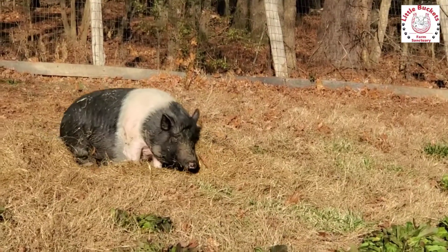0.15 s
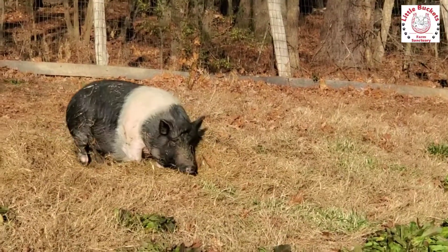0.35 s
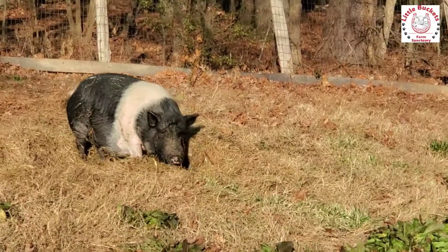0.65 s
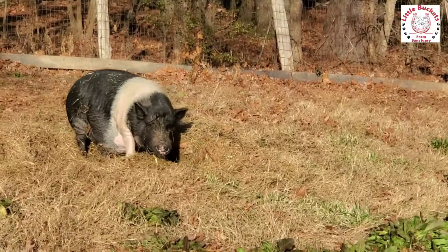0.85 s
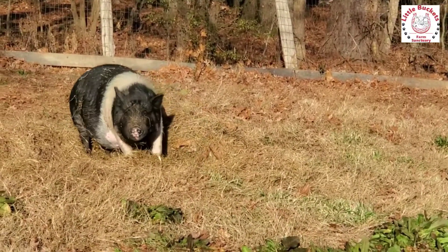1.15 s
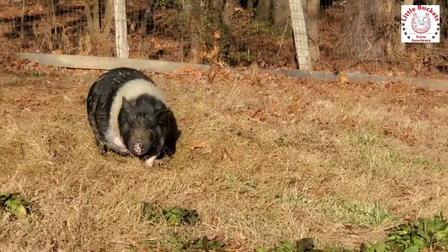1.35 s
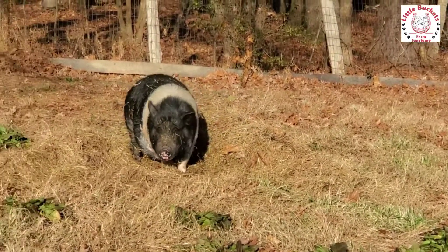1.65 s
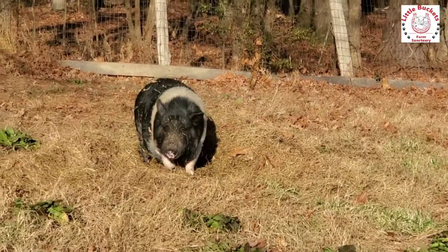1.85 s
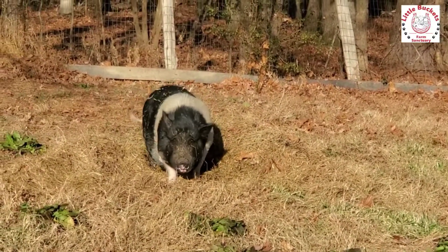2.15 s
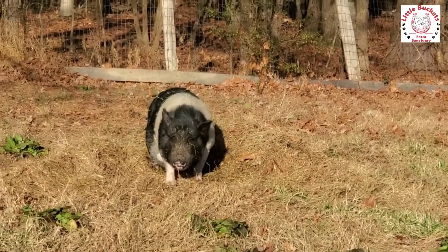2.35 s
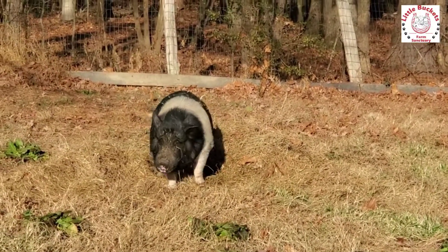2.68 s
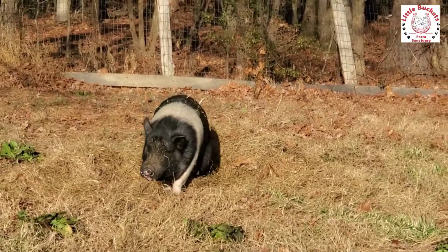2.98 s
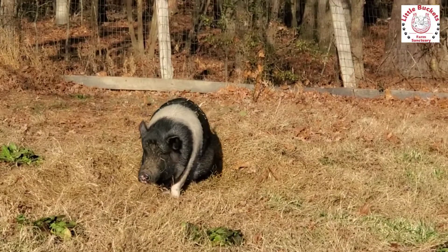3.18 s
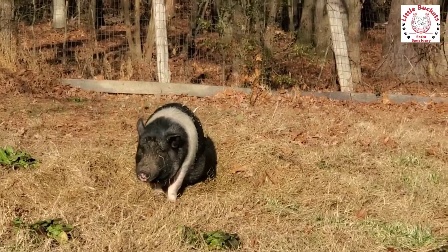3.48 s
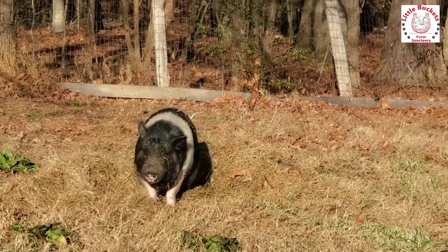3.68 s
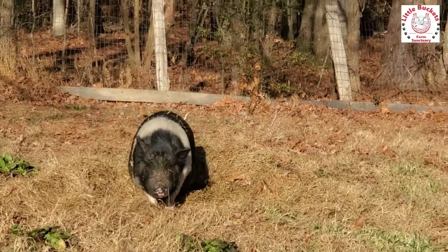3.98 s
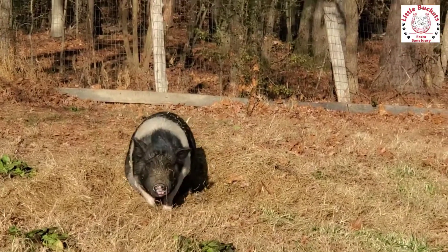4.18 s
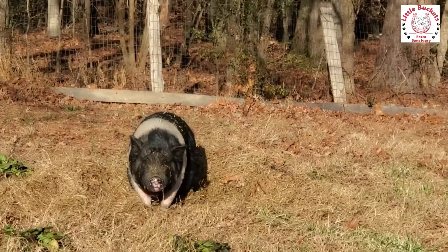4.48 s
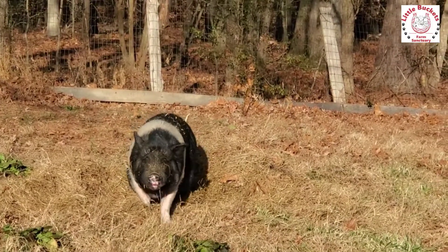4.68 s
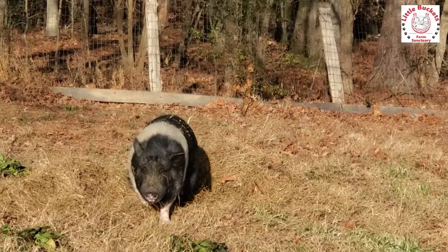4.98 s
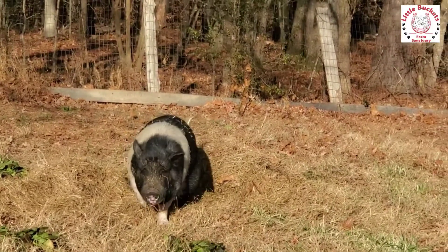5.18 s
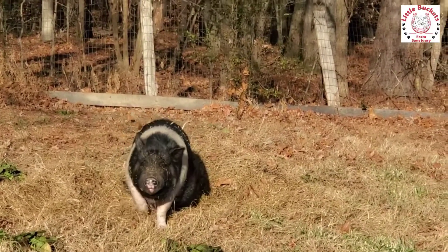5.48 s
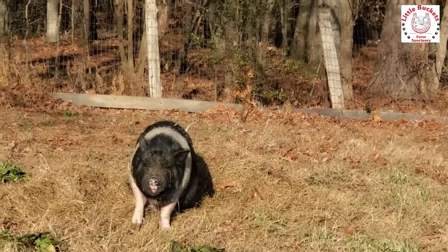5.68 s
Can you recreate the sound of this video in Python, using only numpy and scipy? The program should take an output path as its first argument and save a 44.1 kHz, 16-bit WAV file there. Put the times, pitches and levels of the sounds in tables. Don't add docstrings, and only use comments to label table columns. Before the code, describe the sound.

Outdoors in a dry grassy paddock beside woods, a pig begins mid-grunt, pauses, then repeats short guttural grunts roughly every half second to second. Breath rasps out after most of them and hisses through the nose, with weak rattling snores between. Wind thumps softly on the two microphone ports, swelling around three seconds. Thin insect chirps, a dry stalk tick and dull wooden taps sit behind, with almost no echo.

```python
import sys
import numpy as np
from scipy import signal
from scipy.fft import rfft, irfft, next_fast_len
from scipy.io import wavfile
from scipy.ndimage import uniform_filter1d, map_coordinates

SR = 44100
rng = np.random.default_rng(int(sys.argv[2]) if len(sys.argv) > 2 else 0)


def master_out(mix):
    frames = np.transpose(np.atleast_2d(mix))
    ceiling = np.clip(frames, -1, 1)
    pcm = np.round(ceiling * 32767).astype(np.int16)
    wavfile.write(sys.argv[1], SR, pcm)


def voltage_ratio(decibels):
    exponent = np.asarray(decibels, float) / 20
    return 10 ** exponent


N = 257544
T = np.arange(N) / SR

# f/Hz, width/Hz, level/dB
NOSE = [(3310, 370, 0.5), (4400, 460, 0), (5300, 150, -6), (5650, 200, -8)]
# f/Hz, width/Hz, level/dB
SLACK = [(246, 27, -2.5), (640, 140, 7), (1194, 46, -3), (2300, 52, -12), (2860, 98, -22), (3580, 67, -9.5)]
GAPING = [(395, 57, 0.5), (594, 48, -8.5), (782, 19, -2), (1386, 74, -5), (1830, 70, -7.5),
          (2600, 60, -20.5), (3020, 80, -21.5), (3800, 190, -15)]
WIDE = [(864, 69, -4), (1422, 51, 1.5), (1655, 40, -10), (2260, 86, -22), (2800, 55, -16), (3850, 77, -27)]
BRACED = [(251, 87, -21.5), (511, 33, 1), (625, 67, -9.5), (924, 65, -3.5), (1735, 150, -9),
          (2205, 100, -4.5), (2690, 130, -12), (3500, 140, -17.5)]
SIDELONG = [(525, 220, 1), (806, 65, -4), (1063, 190, -6), (1480, 83, -3.5), (2160, 240, -2),
            (2720, 130, -7), (3170, 130, -3), (3850, 110, -15)]
NASAL = [(564, 83, -1.5), (1280, 26, -15), (1900, 90, -12), (2690, 90, -7), (3250, 77, -3.5),
         (3800, 130, -8)]
PINCHED = [(492, 150, -4.5), (1140, 390, -13.5), (2280, 210, -11.5), (2820, 77, -9), (3300, 190, -9.5),
           (5650, 80, -5)]
EASED = [(588, 185, -1.5), (925, 92, -9), (1108, 190, -4.5), (2050, 84, -8.5), (2270, 180, -20),
         (3150, 160, -10), (3850, 800, -10)]
SHUT = [(597, 180, -1), (1350, 110, -8.5), (1950, 70, -11), (2560, 60, -15), (3200, 60, -18.5)]
DRAWN = [(643, 66, 16), (1336, 56, -3), (2000, 55, -7), (2820, 70, -10), (3210, 81, -11)]
CLENCHED = [(445, 300, 9.5), (1310, 44, 1), (1910, 150, 7), (2750, 60, 15), (3300, 80, 8), (5600, 130, 9)]
SMALL = [(554, 97, -1), (1038, 150, -12.5), (2300, 33, -6.5), (3920, 120, -21.5)]
INWARD = [(324, 110, 8), (650, 130, 1.5), (1240, 51, 5), (1930, 60, -14), (2930, 100, -24),
          (3300, 100, -25)]


def unit(x):
    return x / np.sqrt(np.mean(x ** 2) + 1e-20)


def along(points, hz):
    f, v = np.transpose(points)
    return np.interp(np.log(hz + 1), np.log(f + 1), v)


def curves(rows, t=T):
    s, *cols = np.transpose(rows)
    return [np.interp(t, s, c) for c in cols]


def wobble(rate):
    return map_coordinates(rng.standard_normal(int(N * rate / SR) + 4), [T * rate])


def filtered(x, response):
    n = x.shape[-1]
    m = next_fast_len(n + 8192)
    return irfft(rfft(x, m) * response(np.fft.rfftfreq(m, 1 / SR)), m)[..., :n]


def modes(rows, least_hz):
    wide = [(c, max(w, least_hz + .03 * c), db) for c, w, db in rows]

    def response(f):
        total = 0
        for k, (c, w, db) in enumerate(wide):
            total = total + (-1) ** k * voltage_ratio(db) * 1j * f * w / (c * c - f * f + 1j * f * w)
        return total
    return response


def rush(spectrum, patchy_db):
    z = signal.stft(rng.standard_normal((2, N)), nperseg=512)[2]
    field = uniform_filter1d(uniform_filter1d(rng.standard_normal(z.shape[1:]), 6, 0), 10, 1)
    pair = signal.istft(z * voltage_ratio(patchy_db * unit(field)), nperseg=512)[1][:, :N]
    return unit(filtered(pair, lambda hz: voltage_ratio(along(spectrum, hz))))


def grunts():
    flow = rng.standard_normal(N) * voltage_ratio(1.3 * wobble(70) + 2.5 * wobble(220))
    voice = throat_flaps() + leaks(flow) + rasps(flow)
    return filtered(voice[:N], lambda f: 1 / (1 + (f / 6200) ** 8))


def throat_flaps():
    # t/s, peak level/dB, snap level/dB, rise/ms, snap
    # f/Hz
    flap_events = [(0.0139, -15.5, -16, 1.1, 3360), (.034, -15.5, -21.5, 2.3, 1600),
                   (1.316, -22.5, -25.5, 4.9, 2770), (1.3323, -10.5, -19.5, 3.4, 2650),
                   (1.351, -9.5, -8, 4.1, 3760), (1.372, -23, -19, 1.4, 1820), (1.385, -34, 5.5, 3.7, 1480),
                   (1.886, -11.5, -22, 10.7, 2140), (1.908, -14.5, -4, 2.4, 1830),
                   (1.922, -17.5, -11.5, 4.6, 3850), (2.196, -42.5, 1, 6, 2300),
                   (2.209, -27, -24.5, 2.1, 1830), (2.2387, -9, -17.5, 7.6, 2205),
                   (2.257, -10, -8, 4.5, 1700), (4.118, -34.5, -13.5, 3.5, 1210),
                   (4.141, -45, -6.5, 2.3, 1930), (4.165, -38.5, -5, 4.5, 1930),
                   (4.206, -34, 1.5, 2.5, 1400), (5.787, -33.5, -37, 7.2, 2560),
                   (0.541, -44.5, -36, 2.5, 1900), (0.568, -46.5, -17, 4.1, 3650),
                  (.611, -43, -12, 3.3, 3580), (0.642, -37.5, -11, 1.8, 3800), (0.664, -37, -10.5, 2, 3150),
                  (.677, -34, -22, 5.8, 3300), (0.722, -29.5, -9, 3.3, 2200),
                  (1.306, -34.5, -36, 2.5, 1530), (1.403, -24, -4, 5.4, 1400),
                  (2.602, -40.5, -10, 2.4, 3800), (2.63, -52, 3.5, 0.65, 5600),
                  (2.907, -39.5, -1.5, 2.4, 2066), (2.93, -38.5, -7, 2.3, 2000),
                  (2.952, -39.5, -2.5, 2.3, 1830), (2.987, -26, -28, 1.6, 1400),
                  (3.472, -37, -22, 3.2, 3180), (3.494, -28.5, -9, 2.9, 3200),
                  (3.519, -37, -2.5, 2.3, 2820), (3.545, -35.5, 1.5, 2.5, 2840),
                  (4.913, -39, -7.5, 4.1, 2400), (4.939, -36, -3.5, 3.1, 5650), (5.018, -39, -25, 3, 1400),
                  (5.031, -24.5, -27, 2, 1450), (5.051, -15.5, -14.5, 3, 2720),
                  (5.075, -27.5, -18, 0.88, 2200), (5.804, -22, -17.5, 2.26, 1400),
                  (5.825, -23.5, -17, 1.5, 2560)]
    # f/Hz, width/Hz, level/dB
    hummed = [(610, 144, 13), (1150, 140, -26), (1600, 95, -16), (2400, 100, -20), (3650, 100, -2),
              (4630, 140, -6)]
    opening = [(248.4, 100, -20.5), (493, 91, -2), (757, 53, -12), (990, 91, -16.5), (2140, 130, -8),
               (2840, 80, -19.5)]
    pursed = [(459.3, 21, 0.5), (873, 38, -6), (1830, 75, -14), (2090, 200, -2.5), (2790, 70, -13),
              (3850, 100, -19.5)]
    loosened = [(hz, 1.4 * width, db) for hz, width, db in BRACED]

    first_shapes = [SLACK, hummed] + [GAPING] * 4 + [WIDE, opening] + [pursed] * 2 + [SMALL] * 2
    first_shapes += [BRACED, loosened] + [INWARD] * 4 + [SHUT]
    further_shapes = [EASED] * 2 + [NASAL] * 4 + [EASED, GAPING, WIDE] + [PINCHED] * 2 + [DRAWN] * 3
    further_shapes += [EASED] + [CLENCHED] * 4 + [PINCHED] * 2 + [SIDELONG] * 4 + [SHUT] * 2

    out = np.zeros(N + SR)
    for row, shape in zip(flap_events, first_shapes + further_shapes):
        s, db, snap_db, rise_ms, snap_hz = row
        moved = [(hz * (1 + .02 * rng.normal() * (hz > 1100)), width, level) for hz, width, level in shape]
        ring = flap(moved, snap_hz, snap_db + rng.normal(), rise_ms)
        out[round(s * SR):][:SR // 16] += voltage_ratio(db + 4.0) * ring
    return out


def flap(shape, snap_hz, snap_db, rise_ms):
    t = np.arange(SR // 16) / SR
    hz, width, db = np.transpose(shape)[:, :, None]
    late = np.clip(t - rise_ms / 1000, 0, None)
    swell = np.clip(1000 * t / rise_ms, 0, 1) ** 1.2
    tones = np.sin(2 * np.pi * hz * t)

    low_decay = np.exp(-np.pi * np.clip(width, 35, 200) * late)
    low = -swell * np.sum((hz < 1300) * voltage_ratio(db) * low_decay * tones, axis=0)

    damp_hz = 30 + .02 * hz
    upper = (hz >= 1300) * voltage_ratio(db + rng.normal(0, 0.9, hz.shape))
    high = np.sum(upper * np.exp(-np.pi * np.clip(width, damp_hz, 300) * late) * tones, axis=0)
    snap = np.exp(-np.pi * (20 + 0.033 * snap_hz) * late) * np.sin(2 * np.pi * snap_hz * t)
    high = 0.67 * high / (upper.max() + 1e-9) + 0.77 * snap

    puff = .22 * np.exp(-late / .004)
    spit = puff * signal.lfilter([.3], [1, -1.45, .62], np.diff(rng.standard_normal(len(t) + 1)))
    return low / (np.abs(low).max() + 1e-9) + voltage_ratio(snap_db + 1) * swell ** 2 * (high + spit)


def leaks(air):
    # t/s, length/s, level/dB
    slips = [(.53, .07, -70), (.61, .1, -63), (1.3, .04, -56), (2.195, .04, -64), (2.54, .12, -68),
             (2.906, .07, -63), (3.47, .07, -62), (4.112, .09, -60), (4.912, .07, -64), (5.02, .06, -57),
             (5.785, .055, -57)]
    shapes = [EASED, NASAL, GAPING, SMALL, EASED, DRAWN, CLENCHED, INWARD, PINCHED, SIDELONG, SHUT]
    out = np.zeros(N + SR)
    for (s, length, db), shape in zip(slips, shapes):
        flow = breath(air, [shape, shape], s, s + length, db, bright_db=-9.5, fade=0)
        out[round(s * SR):][:len(flow)] += flow
    return out


def rasps(air):
    # start t/s, end t/s, level/dB, brightness/dB, fade/(dB/s)
    blows = [(0, 0.01, -32, -22, 0), (0.016, 0.144, -40, -0.5, 136), (0.705, 0.875, -43.5, -11, 153),
             (1.343, 1.482, -38.5, 3, 109), (1.839, 1.887, -51.5, -34, 167),
             (1.899, 2.056, -33.5, -4.5, 148), (2.247, 2.39, -36.5, -4, 115.5),
             (2.975, 3.132, -41.5, 3, 164), (3.511, 3.625, -46.5, -29, 142), (4.204, 4.35, -41, -0.5, 146),
             (5.072, 5.248, -47.5, -5, 132)]
    # f/Hz, width/Hz, level/dB
    early_a = [(423, 44, 1.5), (774, 58, 1), (1142, 36, 2), (2320, 89, -30), (2770, 69, -18.5),
               (3750, 27, -29)]
    late_a = [(475, 54, 6), (1124, 27, 5.5), (1300, 38, -1), (2300, 35, 0.5), (3440, 76, -7),
              (3870, 71, -12)]
    early_b = [(814, 38, 9.5), (1355, 75, 3.5), (1700, 40, 3.5), (2290, 29, -28.5), (2830, 32, -16.5),
               (3910, 36, -39)]
    late_b = [(514, 24, -1.5), (707, 17, -3), (914, 56, 0), (1480, 84, -4), (2300, 62, -10),
              (3250, 110, -21.5)]
    early_c = [(465, 24, -0.5), (998, 42, -1), (1760, 61, -7.5), (2255, 50, -15), (2770, 40, -17.5),
               (4250, 47, -24.5)]
    late_c = [(456, 32, 2.5), (1047, 380, -11), (1510, 40, -11.5), (2250, 51, -16.5), (2740, 45, -18),
              (3930, 37, -37)]
    early_d = [(495, 37, 1.5), (993, 32, -2.5), (1830, 34, -7), (2390, 56, -10), (3430, 100, -35.5),
               (4070, 80, -25)]
    late_d = [(466, 19, -1.5), (630, 27, 0.5), (1280, 47, -17.5), (1900, 37, -16), (2390, 170, -18),
              (2710, 63, -40.5)]
    early_e = [(555, 48, -1), (856, 35, -2.5), (1386, 21, -6), (2510, 70, -14), (3270, 40, -23),
               (3860, 110, -24)]
    late_e = [(570, 35, 2), (765, 28, 4.5), (1400, 290, -8), (2490, 110, -11), (3130, 36, -19),
              (4260, 440, -15)]
    early_f = [(390, 204, 3.5), (880, 36, -0.5), (1003, 47, -1), (1330, 79, -4.5), (3740, 34, -19),
               (4000, 26, -31)]
    late_f = [(546, 67, 1), (890, 150, 0.5), (1700, 26, -3), (2420, 29, -8), (3170, 89, -17),
              (4000, 70, -18)]
    spent = [(560, 60, -1.5), (1160, 40, -1), (1600, 80, -8), (2200, 390, -9), (3000, 120, -12),
             (3800, 150, -11)]
    airways = [(SLACK, SLACK), (early_a, late_a), (EASED, EASED), (early_b, late_b), (BRACED, BRACED),
               (early_c, late_c), (early_d, late_d), (early_e, late_e), (CLENCHED, EASED),
               (early_f, late_f), (spent, EASED)]
    out = np.zeros(N + SR)
    for (start, stop, db, bright_db, fade), shapes in zip(blows, airways):
        flow = breath(air, shapes, start, stop, db, bright_db, fade)
        out[round(start * SR):][:len(flow)] += flow
    return out


def breath(air, shapes, start, stop, level_db, bright_db, fade):
    length = stop - start
    t = np.arange(round((length + 0.041) * SR)) / SR
    rise, release = (t + 0.00042) / 0.017, (length + 0.0092 - t) / .022
    edge = np.clip(np.minimum(rise, release), 0, 1)
    turn = np.clip((t / length - .3) / .5, 0, 1) * np.pi / 2
    treble_gain = voltage_ratio(bright_db - 6.5 * t)
    nose = modes(NOSE, least_hz=59)
    split = lambda f: 1 / (1 + (f / 1500) ** 4)
    raw = np.resize(air[round(start * SR):], len(t))

    out = 0
    for shape, share, flow in zip(shapes, (np.cos(turn), np.sin(turn)), (raw, raw[::-1])):
        rings = modes(shape, least_hz=62)
        under_hz = 0.59 * min(shape[0][0], 480)
        tract = lambda f: rings(f) * f ** 6 / (f ** 6 + under_hz ** 6)
        flow = share * edge * voltage_ratio(level_db + 12 - fade * t) * flow / np.std(filtered(flow, tract))
        out = out + filtered(flow, lambda f: tract(f) * split(f))
        out = out + filtered(treble_gain * flow, lambda f: (tract(f) + voltage_ratio(-33.5) * nose(f)) * (1 - split(f)))
    return out


def snores():
    # start t/s, end t/s, first level/dB, last level/dB
    low_snores = [
        (.985, 1.14, -68, -60.5),
        (1.535, 1.62, -54.5, -62.5),
        (4.391, 4.44, -64, -71.5),
    ]
    # start t/s, end t/s, first level/dB, last level/dB
    rattles = [
        (.62, .73, -60.5, -47),
        (1.57, 1.71, -59, -62),
        (5.435, 5.54, -60.5, -62.5),
        (5.65, 5.8, -58, -57),
    ]
    out = 0
    for rows, nose, linger in ((low_snores, NOSE, .995), (rattles, NOSE[2:], .9985)):
        train = np.zeros(N)
        for start, stop, first_db, last_db in rows:
            s = np.arange(start, stop, 1 / 44)
            s = s + .002 * rng.standard_normal(len(s))
            level_db = np.linspace(first_db, last_db, len(s)) + 19 + 2 * rng.standard_normal(len(s))
            train[(s * SR).astype(int)] = voltage_ratio(level_db)
        puffs = signal.lfilter([1], [1, -linger], train) * rng.standard_normal(N)
        out = out + filtered(puffs, modes(nose, least_hz=27))
    return out


def wind():
    # t/s, peak level/dB, sharpness/dB
    gusts = [(0.046, -28, -10), (.097, -43, -7), (0.147, -36.5, -20), (.189, -26.5, -27),
             (.384, -42.5, -7.5), (0.414, -32, -19), (0.63, -40.5, -3), (.684, -29, -16.5),
             (.762, -42, -12), (0.826, -33, -10.5), (0.891, -37, -7), (0.932, -32, -7), (.979, -38.5, -20),
             (1.043, -39, -2.5), (1.074, -32.5, -5.5), (1.122, -33, -13), (1.228, -37.5, -11.5),
             (1.295, -38.5, -6), (1.349, -33, -10), (1.39, -31.5, -8.5), (1.467, -36, -9.5),
             (1.522, -32, -18), (1.575, -41, -17), (1.728, -33, -18.5), (1.962, -45.5, -18),
             (2.175, -50.5, -12.5), (2.574, -35.5, -16), (2.632, -35.5, -13), (2.708, -34, -6),
             (2.743, -28.5, -17.5), (2.792, -38, -4.5), (2.857, -35, 1), (2.885, -26.5, -9),
             (2.932, -34.5, 0), (2.975, -23.5, -20), (3.04, -34, -17), (3.093, -34, -15.5),
             (3.272, -29, -20), (3.33, -34.5, -13), (3.407, -31.5, -3), (3.431, -28.5, -6),
             (3.498, -22, -15), (3.583, -29.5, -7), (3.622, -19.5, -21), (3.668, -38, -13),
             (3.714, -35.5, -8.5), (4.125, -41.5, -2), (4.173, -32.5, -9), (4.252, -37, -9),
             (4.436, -39, -26), (4.536, -47, -24), (4.919, -36, -18), (5.019, -35, -21), (5.094, -37, -12),
             (5.237, -44.5, -8.5), (5.304, -43.5, -26.5), (5.832, -46, -11.5)]
    # t/s, left-right level/dB
    gust_side = [(0.0, -6.5), (0.94, 3), (1.14, 0.5), (1.82, -2), (2.0, -14), (2.2, -2), (5.34, 0),
                 (5.56, -5.5), (5.84, -11)]
    # f/Hz, density level/dB
    buffet = [(12, -48.5), (20, -21), (37, -4), (72, 7), (100, -1), (194, -13.5), (290, -17), (550, -31),
              (840, -56.5), (1400, -120)]
    s, peak_db, sharp_db = np.transpose(gusts)[:, :, None]
    late = T[::64] - s
    reach = np.abs(late / np.where(late < 0, 0.02, 0.025))
    power = voltage_ratio(2 * peak_db - 20 * reach ** 0.93)
    calm = voltage_ratio(2 * (-56.5 + 2.5 * wobble(9)[::64]))
    low = np.sqrt(calm + power.sum(axis=0))
    edge = np.sqrt(calm * voltage_ratio(2 * -14) + (power * voltage_ratio(2 * sharp_db)).sum(axis=0))
    low, edge = np.interp(T, T[::64], low), np.interp(T, T[::64], edge)

    pan_db = curves(gust_side)[0]
    raw = voltage_ratio(1.1 * np.array([wobble(25.2), wobble(25)])) * rush(buffet, patchy_db=4.5)
    deep = filtered(raw, lambda f: 1 / (1 + (f / 150) ** 4))
    steady = lambda x: x / np.sqrt(np.abs(uniform_filter1d(x ** 2, size=1500)) + 1e-12)
    lumps = low * steady(deep) + voltage_ratio(2.5) * edge * steady(raw - deep)
    return voltage_ratio(2.0 + np.array([pan_db, -pan_db]) / 2) * lumps


def crickets():
    # start t/s, end t/s, f/Hz, level/dB
    chirps = [(0, 0.028, 8800, -56), (.28, .35, 7600, -76), (0.383, 0.456, 8700, -58.5),
              (.77, 0.83, 8850, -60), (1.062, 1.124, 8660, -56.5), (4.115, 4.17, 9460, -63),
              (4.46, 4.532, 9700, -66), (4.712, 4.794, 8600, -61), (4.908, 4.99, 9650, -58),
              (5.441, 5.531, 9700, -56)]
    out = np.zeros(N)
    strokes, drift = np.sin(np.pi * 75 * T) ** 4, 0.8 * wobble(200)
    for start, stop, hz, db in chirps:
        k = slice(round(start * SR), round(stop * SR))
        swell = np.clip(np.minimum(T[k] - start, stop - T[k]) / 0.0083, 0, 1)
        out[k] += voltage_ratio(db) * swell * strokes[k] * np.sin(2 * np.pi * hz * T[k] + drift[k])
    return out


def taps(rows, cycles):
    out, t = np.zeros(N + SR), np.arange(SR // 10) / SR
    for s, db, hz in rows:
        out[round(s * SR):][:len(t)] += voltage_ratio(db - 4.0 - 60 * t * hz / cycles) * np.sin(2 * np.pi * hz * t)
    return out[:N]


def hiss_and_rustle():
    # start t/s, end t/s, first level/dB, last level/dB
    hiss_puffs = [(0, 0.138, -54, -57.5), (0.593, 0.71, -74, -63.5), (0.71, 0.866, -52, -64.5),
                  (0.855, 1.251, -67, -67), (1.252, 1.471, -57.5, -54), (1.485, 1.633, -59.5, -84),
                  (1.887, 2.037, -50.5, -78), (2.229, 2.394, -59.5, -68.5), (2.566, 2.7, -75, -66),
                  (2.77, 2.91, -65, -69), (2.902, 3.178, -54, -64), (3.19, 3.422, -70.5, -69.5),
                  (3.424, 3.505, -59, -61.5), (3.52, 3.622, -55.5, -56), (3.648, 3.751, -62, -66),
                  (4.111, 4.193, -65, -51.5), (4.204, 4.353, -47, -67.5), (4.364, 4.654, -68.5, -67),
                  (4.88, 5.078, -69.5, -62), (5.092, 5.235, -53.5, -61.5), (5.444, 5.748, -69, -67),
                  (5.756, 5.85, -65, -57.5)]
    # f/Hz, density level/dB
    nostril = [(2600, 0), (4500, -4.5), (6100, -7), (7000, -11), (9400, -7.5), (11400, -10), (13000, -15),
               (14500, -22), (15500, -42)]
    # t/s, level/dB
    far_level = [(0, -50), (.2, -65.5), (.5, -67.5), (1, -70), (1.8, -61.5), (2.45, -63.5), (3.2, -67),
                 (3.7, -66), (3.9, -69), (4.4, -63.5), (4.8, -64), (5.35, -66), (5.6, -65.5), (5.84, -62.5)]
    # f/Hz, density level/dB
    field = [(90, -39.5), (200, -17.5), (560, -2.5), (1100, -13.5), (1900, -18), (2800, -22.5),
             (5400, -30.5), (8800, -40.5), (12000, -45), (15500, -53.5)]
    # f/Hz, density level/dB
    chorus = [(3000, -34.5), (6500, -8.5), (8000, -10), (8800, 0), (9800, -8.5), (12500, -17.5),
              (15500, -28.5)]
    power = np.zeros(N)
    for start, stop, first_db, last_db in hiss_puffs:
        k = slice(round(start * SR), round(stop * SR))
        power[k] += voltage_ratio(2 * np.interp(T[k], [start, stop], [first_db, last_db]))
    trailing = signal.lfilter([.002], [1, -.998], uniform_filter1d(power, 500))
    puffs = np.sqrt(np.abs(trailing))
    hiss = puffs * voltage_ratio(2.7 + 1.5 * wobble(40) + 2 * wobble(250)) * rush(nostril, patchy_db=1.8)
    far = voltage_ratio(curves(far_level)[0] + 4 + 1.5 * wobble(12)) * rush(field, patchy_db=.9)
    insects = voltage_ratio(-75.5 + 3 * wobble(7)) * rush(chorus, patchy_db=4.0)
    return hiss + far + insects


def trees(x):
    # f/Hz, t60/s
    wood = [(300, .2), (2000, 0.094), (8000, 0.054)]
    hz, t, z = signal.stft(rng.standard_normal((2, SR // 3)), SR, nperseg=256)
    tail = signal.istft(z * voltage_ratio(-60 * t / along(wood, hz)[:, None]), SR, nperseg=256)[1]
    delayed = np.pad(x, (200, 0))[None]
    return signal.fftconvolve(delayed, tail / np.linalg.norm(tail[0]), axes=1)[:, :N]


def scene():
    # t/s, peak level/dB, f/Hz
    ticks = [
        (0.4334, -50, 4600),
        (3.3, -55, 6200),
        (3.8, -52, 7400),
        (4.574, -33, 5640),
        (5.4, -40.5, 7150),
    ]
    # t/s, peak level/dB, f/Hz
    knocks = [
        (1.751, -39, 464),
        (4.5, -47, 390),
        (5.58, -39.5, 950),
    ]
    # f/Hz, left-right level/dB
    ports = [(300, 0), (1000, .8), (2500, -1), (5000, -2), (9000, -4.6), (15000, -6)]
    near = grunts() + snores() + taps(ticks, cycles=28) + taps(knocks, cycles=43) + crickets()
    lead = np.array([[51e-6], [-51e-6]])  # s, shrinking in the treble
    direct = filtered(np.array([near, near]), lambda f: np.exp(2j * np.pi * f * lead / (1 + (f / 6500) ** 2)))
    heard = direct + voltage_ratio(-17) * trees(near) + hiss_and_rustle()
    return filtered(heard, lambda f: voltage_ratio(along(ports, f) * np.array([[.5], [-.5]]))) + wind()


def top_cut(x):
    return signal.sosfilt(signal.butter(12, 15670, fs=SR, output="sos"), x)


def record(dry):
    return top_cut(dry)


dry = scene()
out = record(dry)
master_out(out)
```